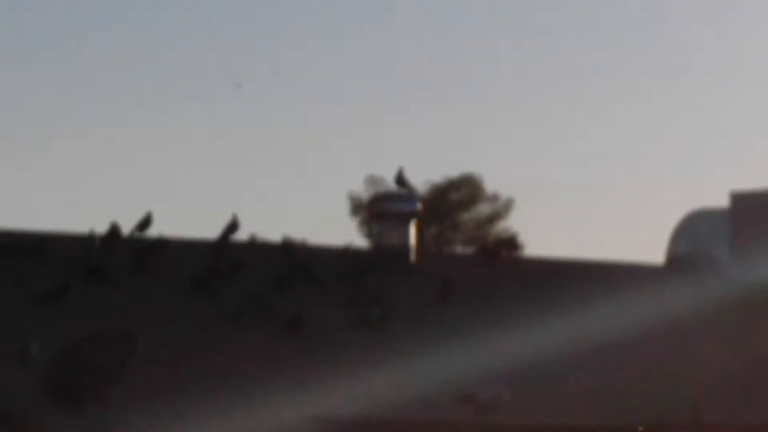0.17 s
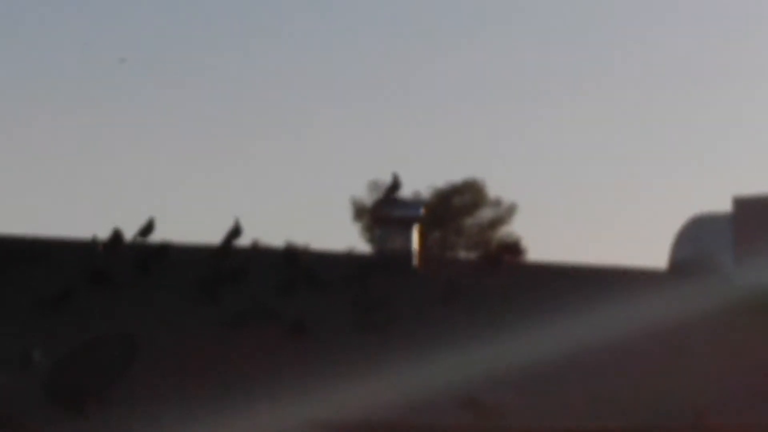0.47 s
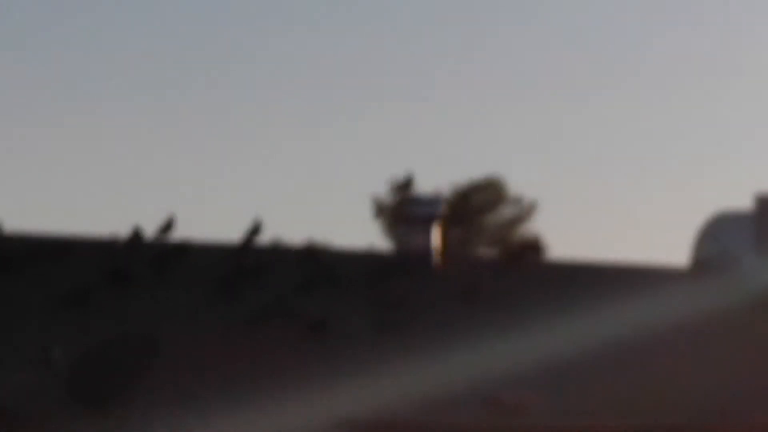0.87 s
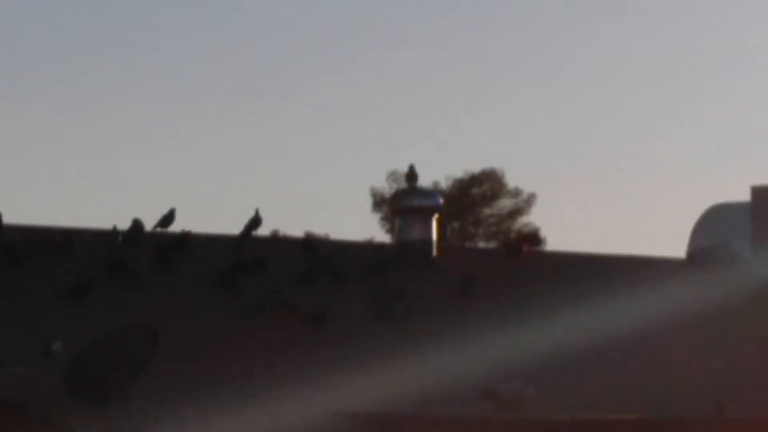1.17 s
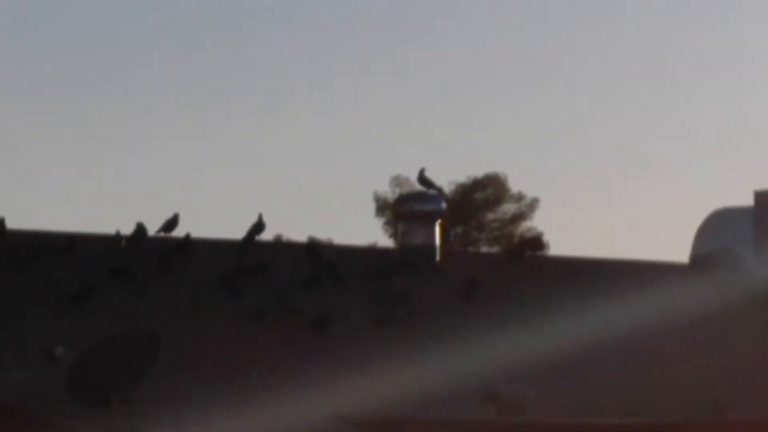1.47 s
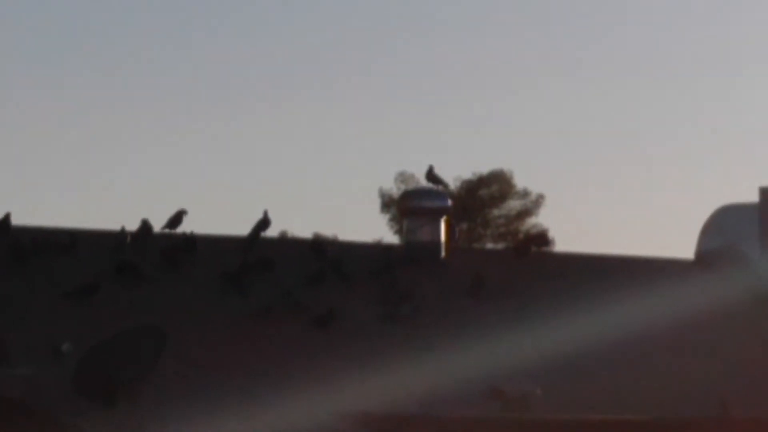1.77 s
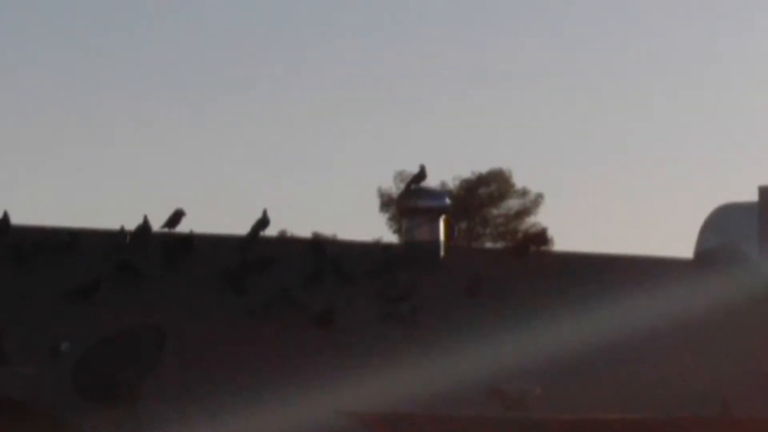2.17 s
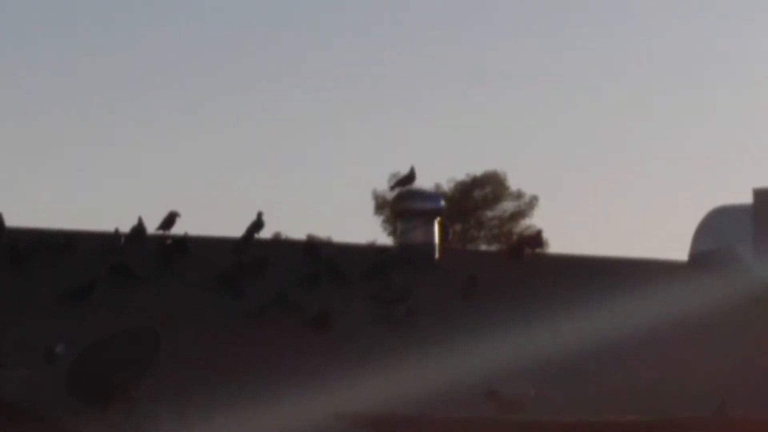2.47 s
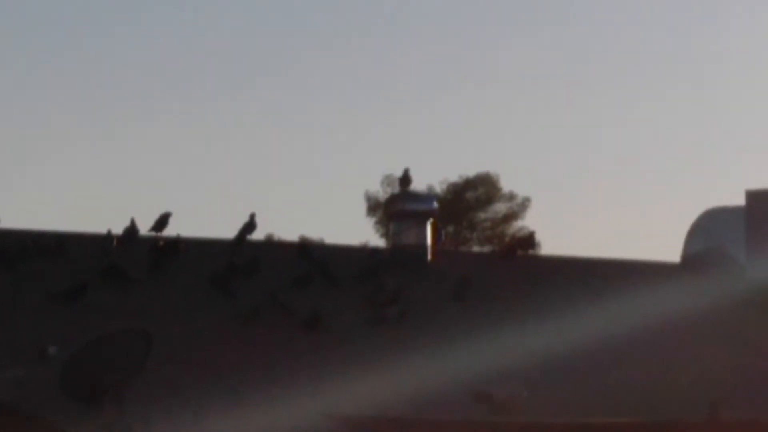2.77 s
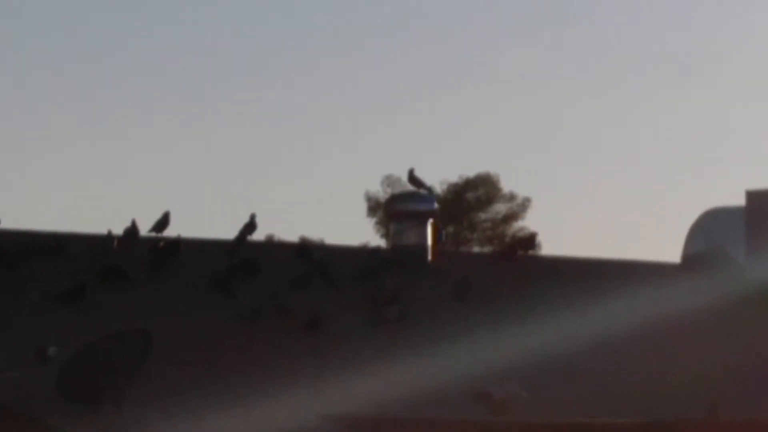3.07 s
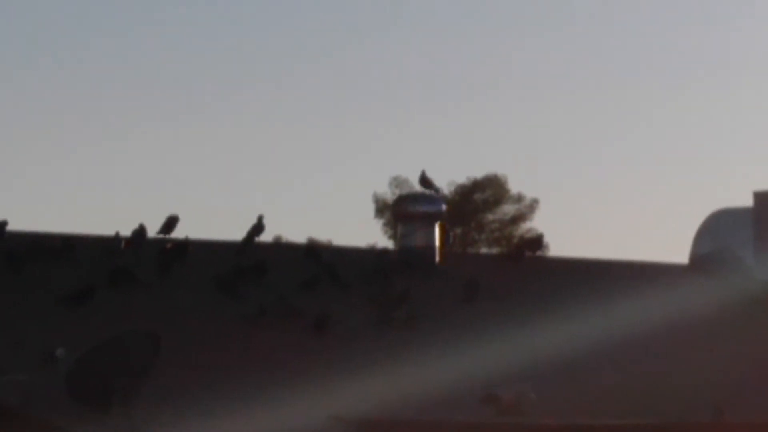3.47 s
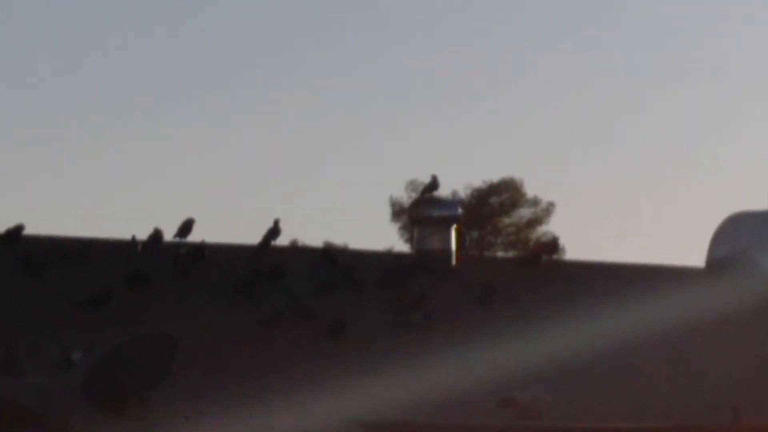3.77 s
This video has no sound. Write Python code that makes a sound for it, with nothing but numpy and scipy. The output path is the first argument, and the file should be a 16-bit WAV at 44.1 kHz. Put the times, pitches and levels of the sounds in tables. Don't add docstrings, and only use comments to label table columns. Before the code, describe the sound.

Birds chirping on a roof at dusk, one near bird's rising whoops echoing over muffled traffic hum

```python
import sys
import numpy as np
from scipy import signal
from scipy.fft import rfft, irfft, next_fast_len
from scipy.io import wavfile
from scipy.ndimage import uniform_filter1d

SR = 44100
rng = np.random.default_rng(int(sys.argv[2]) if len(sys.argv) > 2 else 0)


def to_wav(sig):
    pcm = np.clip(np.atleast_2d(sig), -1, 1) * 32767
    pcm = np.round(pcm).astype(np.int16)
    wavfile.write(sys.argv[1], SR, pcm.T)


def convert_level_to_amplitude(level_db):
    exponent = np.asarray(level_db, float) / 20
    return 10 ** exponent


N = 172872
M = next_fast_len(N)
t = np.arange(N) / SR
PERCHES = 6
BEAK_HZ, BEAK_WIDTH_HZ = 10100, 1500
RASP_DB = 2
RASP = 1 + convert_level_to_amplitude(RASP_DB) * uniform_filter1d(rng.standard_normal(N), 36) * 6
# t/s, level/dB
BUSTLE = [(0, 3), (.25, -4.5), (.5, 7.5), (.9, 1), (1.4, -2.5), (1.65, -0.5), (2.1, -0.5), (2.6, -1),
          (3.1, 0.5), (3.5, -2.5), (3.92, 0)]


def level(x, db):
    return x * convert_level_to_amplitude(db) / np.sqrt(np.mean(x ** 2))


def curve(x, points):
    at, value = np.array(points).T
    return np.interp(x, at, value)


def walk(rate):
    k = int(SR / rate)
    held = np.repeat(rng.standard_normal(N // k + 1), k)
    return 1.323 * uniform_filter1d(uniform_filter1d(held, k), k)[:N]


def ring(f, hz, width):
    return 1 / (1 + ((f ** 2 - hz ** 2) / (f * width + 1e-9)) ** 2)


def band(hz, width):
    f = np.fft.rfftfreq(M, 1 / SR)
    a, b = rng.standard_normal((2, len(f))) * np.sqrt(M / 2)
    return irfft((a + 1j * b) * ring(f, hz, width), M)[:N]


def causal(x, gain):
    c = irfft(np.log(gain(np.fft.rfftfreq(4096, 1 / SR)) + 1e-6))
    c[1:2048] *= 2
    c[2049:] = 0
    response = irfft(np.exp(rfft(c)))[:2048]
    return signal.fftconvolve(x, response)[:len(x)]


def tail(t60, db):
    u = t[:SR // 2]
    return level(rng.standard_normal(len(u)) * convert_level_to_amplitude(-60 * u / t60), db) / np.sqrt(len(u))


def echo(x, response):
    return signal.fftconvolve(x, response)[:N]


def rumble():
    # f/Hz, width/Hz, level/dB
    hums = [(49.7, 12, -12), (73, 23.7, -2), (96.6, 38.7, -0.5), (146.5, 28.7, -3.5), (216.9, 29.3, -0.5),
            (286.4, 21.6, -10), (342, 68.6, -14), (423, 29, -19.5), (610, 142, -23.5), (852, 318, -18.5),
            (1220, 510, -30)]
    # t/s, level/dB
    traffic = [(0, 1), (.5, 2.5), (.9, 1.5), (1.3, 1.5), (1.6, -0.5), (2, -1), (2.5, -1.5), (2.8, -1.5),
               (3.1, 0), (3.5, -1), (3.92, -0.5)]
    rumble_db, swell_db, flicker_db = -42.5, 0.6, 1.22
    out = np.zeros(N)
    swell = swell_db * walk(1.83) + curve(t, traffic)
    for hz, width, db in hums:
        out += convert_level_to_amplitude(db + swell + flicker_db * walk(7.8)) * band(hz, width)
    return level(out, rumble_db)


def fan():
    fan_hz, fan_db = 1420, -71.5
    loudness = np.sqrt(2) * convert_level_to_amplitude(fan_db + walk(2.7))
    return loudness * np.sin(2 * np.pi * fan_hz * t + 0.7 * walk(3.97))


def hiss():
    return level(band(9000, 44000), -70)


def air():
    # f/Hz, level/dB per Hz
    spectrum = [(500, -8.5), (1500, -0.5), (2500, 0.5), (4000, 4.5), (6000, -1.5), (9000, -1.5),
                (15000, -3.5)]
    air_db = -49
    out = np.zeros(N)
    hz0, db0 = np.array(spectrum).T
    bustle = curve(t, BUSTLE) + 2.24 * walk(9.1)
    for hz in 500 * 2 ** np.arange(0, 5.1, 1 / 3):
        db = np.interp(np.log(hz), np.log(hz0), db0) + bustle + 3 * walk(22.1)
        out += convert_level_to_amplitude(db) * band(hz, hz / 4)
    return out * convert_level_to_amplitude(air_db)


def rustles():
    # t/s, peak level/dB, fade t60/s, tilt/dB per octave
    touches = [(0.0695, -50, 0.48, 1.5), (0.0866, -45.5, 0.24, 16), (0.1206, -42, 0.38, 3.5),
               (0.1465, -41, 0.21, -10), (0.175, -40.5, 0.099, -2), (0.272, -42, 0.29, 0),
               (0.4305, -25.5, 0.15, 0.5), (0.4544, -32, 0.11, -4), (0.4618, -37, 0.16, 5.5),
               (.5208, -44, 0.09, 11), (0.548, -37.5, 0.12, -6), (0.5726, -47, 0.25, -10.5),
               (0.6654, -46, 0.1, 5), (0.7217, -38, 0.18, 2.5), (1.188, -42, 0.21, -3.5),
               (1.5529, -44, 0.14, -2), (2.6788, -47.5, 0.22, 10), (2.8344, -43, 0.12, -1),
               (2.9225, -47, 0.31, -3), (3.0462, -42.5, 0.17, -1), (3.2186, -48.5, 0.14, 5)]
    rustle_db, grain_db, attack_s = 5, 2, 0.0026
    crack_db, crack_t60_s, firm_db = -2.5, 0.014, -36.5
    out = np.zeros(N)
    noise = rng.standard_normal(N) * convert_level_to_amplitude(grain_db * walk(500))
    for s, db, t60, tilt_db in touches:
        i = int(s * SR)
        x = noise[i:i + SR // 4]
        u = np.arange(len(x)) / SR
        fade = convert_level_to_amplitude(-60 * u / max(t60, .01))
        crack = convert_level_to_amplitude(crack_db + min(db - firm_db, 0) - 60 * u / crack_t60_s)
        x = x * np.minimum(u / attack_s, 1) * (fade + crack)

        def brightness(f):
            tilt = np.clip(tilt_db * np.log2((f + 1200) / 8000), -40, 30)
            return convert_level_to_amplitude(tilt) * f / (f + 900)

        out[i:i + len(x)] += convert_level_to_amplitude(db + rustle_db) * causal(x, brightness)
    return out


def beak(f):
    floor_db = -19
    return (convert_level_to_amplitude(floor_db) + ring(f, BEAK_HZ, BEAK_WIDTH_HZ)) * (f < .4 * SR)


def add_whistle(out, start, hz, db, overtones_db):
    i = max(int(start * SR), 0)
    n = min(len(hz), N - i)
    hz = hz[:n]
    phase = 2 * np.pi * np.cumsum(hz) / SR
    over = np.zeros(n)
    for k, overtone_db in enumerate(overtones_db, 2):
        over += convert_level_to_amplitude(overtone_db) * beak(k * hz) * np.sin(k * phase)
    u = np.arange(n) / len(db)
    edges = np.clip(np.minimum(u, 1 - u) / 0.09, 0, 1)
    voice = np.sin(phase) + over * RASP[i:i + n]
    out[i:i + n] += np.sqrt(2) * convert_level_to_amplitude(db[:n]) * voice * edges


def span(length):
    return np.linspace(0, 1, max(int(length * SR), 9))


def slide(u):
    return u


def arc(u):
    top, roundness = .56, 1.3
    return 1 - np.abs(np.interp(u, [0, top, 1], [-1, 0, 1])) ** roundness


def far_calls():
    far_db, spread_db, low_hz, high_hz, length_s = -67, 1.5, 3200, 6100, .035
    when, size, pitch, loud = rng.random((600, 4)).T
    start = N / SR * (np.arange(len(when)) + when) / len(when)
    top = low_hz * (high_hz / low_hz) ** pitch
    foot = top * (.7 + .15 * size)
    db = far_db + spread_db * (2 * loud - 1) + curve(start, BUSTLE)
    return zip(start, length_s * (.5 + size), foot, top, db)


def flock():
    # t/s, length/s, from
    # f/Hz, to f/Hz, level/dB
    slides = [(.078, 0.019, 3950, 4160, -45), (.345, 0.034, 3250, 6050, -46), (.38, 0.019, 4460, 4300, -42),
              (.38, 0.033, 3400, 3970, -49.5), (.52, 0.021, 5760, 4870, -44.5),
              (.54, .016, 5040, 5800, -41.5), (.56, .035, 5540, 5450, -43), (.618, 0.038, 4250, 2770, -44),
              (.675, .035, 4200, 3400, -46.5), (.88, 0.052, 3400, 4020, -47.5), (.9, .03, 3190, 2720, -56),
              (1.035, 0.077, 5840, 5990, -50), (1.096, 0.017, 4100, 4830, -44),
              (1.136, 0.019, 4700, 5020, -45), (1.62, 0.032, 4900, 5560, -49),
              (1.652, 0.019, 5580, 4900, -45.5), (1.625, 0.03, 2794, 3760, -46.5),
              (1.655, 0.021, 3310, 3040, -49.5), (1.735, 0.024, 3620, 4010, -53),
              (1.755, .03, 5000, 5600, -57), (1.852, 0.039, 5750, 6440, -54.5),
              (1.935, 0.059, 5430, 6340, -50), (2.09, 0.03, 3200, 2570, -54),
              (2.25, 0.054, 3000, 4240, -56), (2.49, .022, 4100, 3670, -46), (2.51, 0.017, 3630, 3860, -47),
              (2.585, 0.046, 5880, 4920, -50), (2.625, 0.034, 5600, 6090, -44),
              (2.64, 0.013, 4910, 3800, -51), (3.368, 0.024, 3900, 4830, -56),
              (3.39, 0.02, 4490, 3560, -47.5), (3.405, .018, 3590, 3800, -49),
              (3.43, 0.039, 2800, 4100, -51), (3.467, .018, 3910, 3060, -48),
              (3.612, 0.02, 5100, 5400, -44), (3.802, 0.016, 5300, 5900, -47),
              (3.005, 0.033, 3400, 4520, -51.5), (3.145, 0.018, 5520, 5450, -59),
              (3.32, .025, 3720, 3560, -63), (.09, 0.027, 5860, 6100, -59)]
    # t/s, length/s, outer f/Hz, turning f/Hz, level/dB
    arcs = [(1.5, 0.044, 3000, 4000, -55), (.41, .03, 3300, 4000, -56), (2.27, .05, 4100, 4300, -59.5),
            (1.7, .045, 3050, 3700, -55.5), (2.165, 0.074, 3300, 5500, -48),
            (2.425, .04, 3000, 5400, -49.5), (2.54, .055, 2800, 3950, -50),
            (2.555, 0.045, 5100, 6600, -50.5), (2.608, .035, 4400, 5300, -46),
            (2.9, 0.047, 3150, 5000, -48), (2.99, 0.065, 3700, 5000, -50.5), (3.095, .048, 3114, 3900, -50),
            (3.19, 0.059, 2955, 3700, -57), (1.575, .03, 3400, 3700, -45.5),
            (0.54, 0.0284, 4200, 5700, -45.5), (0.9, 0.0375, 3094, 4000, -50),
            (1.4, 0.034, 5800, 5000, -49), (1.705, 0.031, 2600, 3200, -58.5), (2.5, .022, 2700, 5700, -45),
            (2.48, .025, 3800, 5900, -47.5), (.488, 0.024, 4900, 4200, -50), (1.02, .035, 3300, 4200, -49),
            (2.785, 0.071, 3300, 3500, -54), (0.91, 0.016, 3100, 3700, -51), (.81, .04, 3300, 4100, -51.5),
            (0.59, 0.023, 3300, 5500, -60), (2.8, .03, 4300, 3500, -49), (3.195, .06, 3700, 3900, -55.5),
            (2.92, 0.0406, 4100, 3900, -55), (2.83, .05, 3700, 4100, -55), (1.58, 0.04, 3700, 5000, -48),
            (.47, 0.039, 5200, 5900, -47), (2.6, .035, 5300, 7500, -57), (1.5, 0.024, 4300, 4550, -55)]
    flock_overtones = [-18, -28]
    warble = 1 + .014 * walk(150)
    flutter_db = 2.5 * walk(280)
    near, far = np.zeros((2, PERCHES, N))
    for calls, path, out in ((slides, slide, near), (arcs, arc, near), (far_calls(), arc, far)):
        for j, (s, length, a, b, db) in enumerate(calls):
            u = span(length)
            k = np.minimum(int(s * SR) + np.arange(len(u)), N - 1)
            hz = a * (b / a) ** path(u) * warble[k]
            add_whistle(out[j % PERCHES], s, hz, db + flutter_db[k], flock_overtones)
    return near, far


def flock_on_roofs():
    dry_db, t60_s, echo_db, early_t60_s, early_db = -1, .25, -4, .05, -2
    far_dry_db, far_t60_s = -1, .14
    out = np.zeros(N)
    for close, distant in zip(*flock()):
        roofs = tail(t60_s, echo_db) + tail(early_t60_s, early_db)
        out += convert_level_to_amplitude(dry_db) * close + echo(close, roofs)
        out += convert_level_to_amplitude(far_dry_db) * distant + echo(distant, tail(far_t60_s, 0))
    return out


def whoops():
    # t/s, length/s, from f/Hz, to f/Hz, level/dB
    whoop_notes = [
        (1.055, 0.086, 1523, 5095, -32),
        (1.178, 0.043, 1372, 2590, -35.5),
        (1.264, 0.069, 1547, 4350, -34.5),
        (1.543, 0.048, 1800, 4213, -47.5),
        (3.528, .09, 1400, 5230, -30),
        (3.652, 0.049, 1414, 2880, -35),
        (3.733, 0.073, 1393, 5600, -30),
    ]
    whoop_overtones = [-8, -10, -17, -23]
    flick, flick_power = 0.24, 4.3
    db_per_octave, full_hz = 14, 3500
    peak, fade_db = 0.81, 7
    flutter_db = 1.5
    out = np.zeros(N)
    for s, length, a, b, db in whoop_notes:
        u = span(length)
        hz = a * (b / a) ** ((1 - flick) * u + flick * u ** flick_power)
        swell = db_per_octave * np.log2(np.minimum(hz / min(full_hz, b), 1))
        thinning = np.interp(u, [peak, 1], [0, fade_db])
        add_whistle(out, s, hz, db + swell - thinning, whoop_overtones)
    return out * convert_level_to_amplitude(flutter_db * walk(220))


def whoops_on_roofs():
    whoop = whoops()
    shine = causal(tail(0.28, 3.5), lambda f: ring(f, BEAK_HZ, BEAK_WIDTH_HZ))
    roofs = tail(.45, -4) + tail(.06, -3) + shine
    return whoop + echo(whoop, roofs)


def in_cabin(x):
    # f/Hz, width/Hz, level/dB
    cabin = [(800, 360, -2.5), (1220, 790, -11), (1786, 380, -10), (2184, 660, -8), (2875, 680, -4.5),
             (3400, 650, -1), (4100, 1920, -1), (5600, 1200, 1), (7550, 1300, -5), (10200, 2050, -14.5),
             (12400, 2400, -41)]
    return causal(x, lambda f: np.sqrt(sum((convert_level_to_amplitude(db) * ring(f, hz, w)) ** 2 for hz, w, db in cabin)))


def scene():
    coloured = in_cabin(air() + rustles() + flock_on_roofs() + whoops_on_roofs())
    return (coloured + rumble() + fan() + hiss())[None]


def top_cut(x):
    return signal.sosfilt(signal.butter(12, 16510, fs=SR, output="sos"), x)


def record(dry):
    top_hz, offset, start_s, fade_s = 15740, -.0008, .0712, 0.00066
    x = signal.sosfilt(signal.ellip(10, .2, 60, top_hz, fs=SR, output="sos"), dry)
    opening = np.clip((t - start_s) / fade_s, 0, 1)
    return top_cut((x + offset) * opening)


dry = scene()
out = record(dry)
to_wav(out)
```